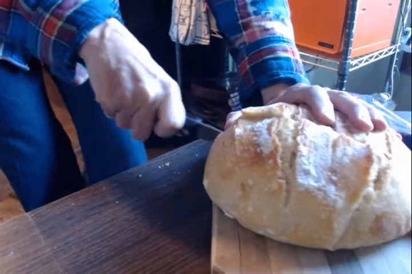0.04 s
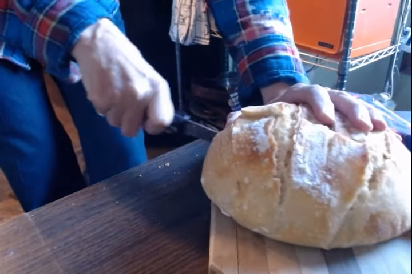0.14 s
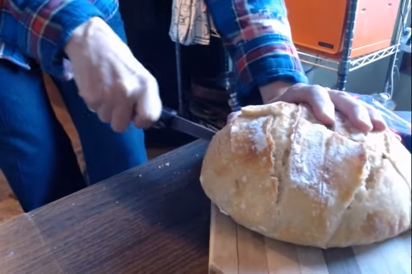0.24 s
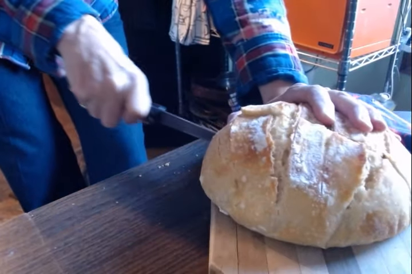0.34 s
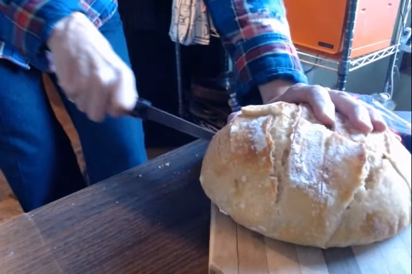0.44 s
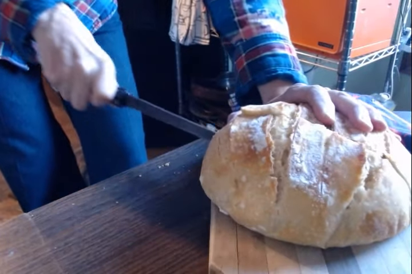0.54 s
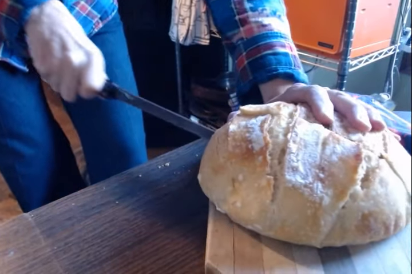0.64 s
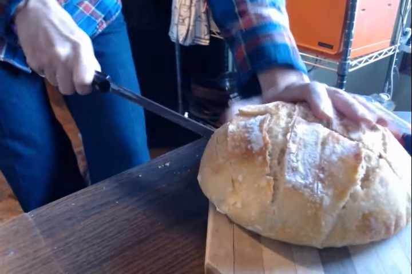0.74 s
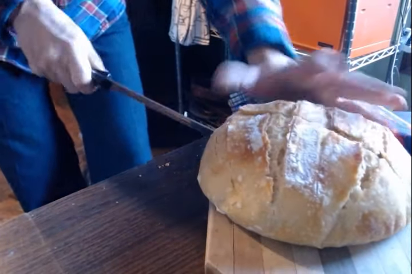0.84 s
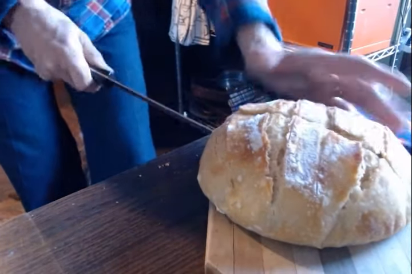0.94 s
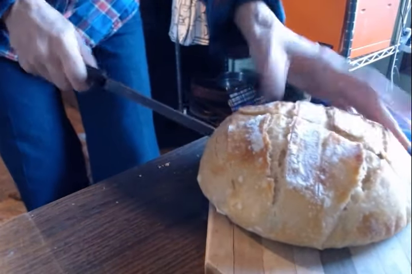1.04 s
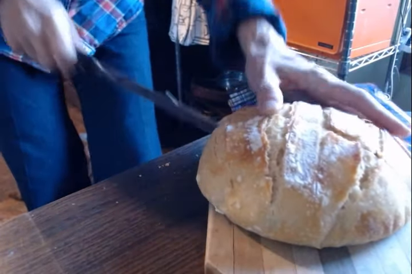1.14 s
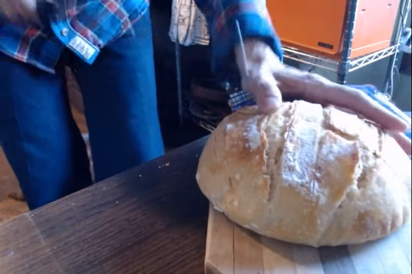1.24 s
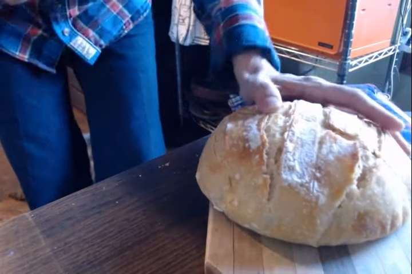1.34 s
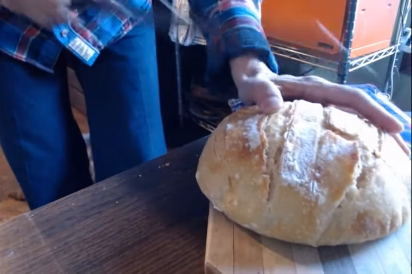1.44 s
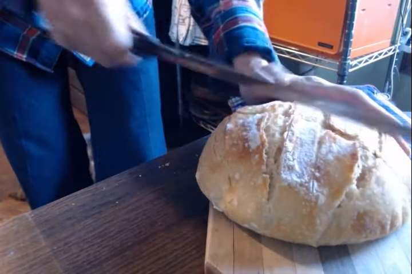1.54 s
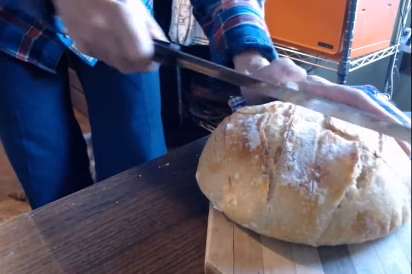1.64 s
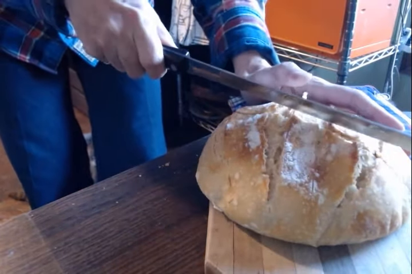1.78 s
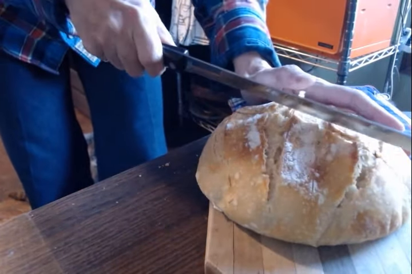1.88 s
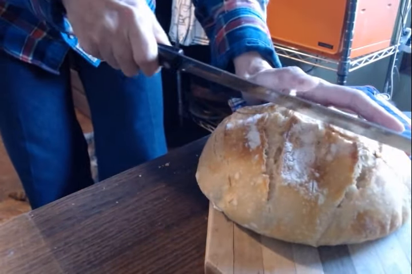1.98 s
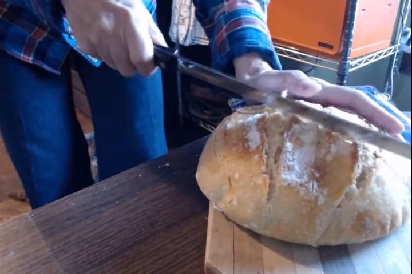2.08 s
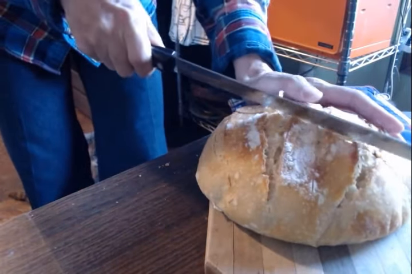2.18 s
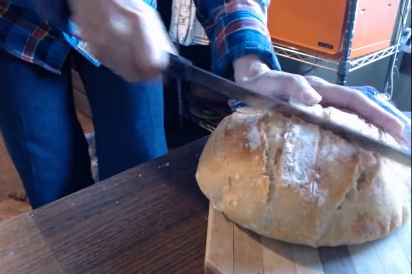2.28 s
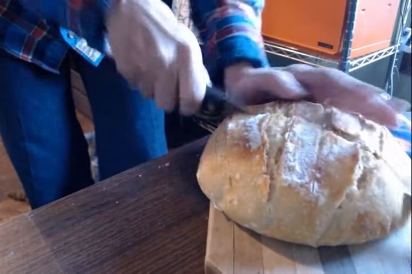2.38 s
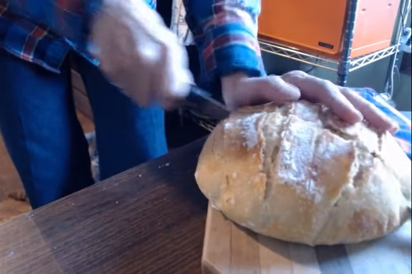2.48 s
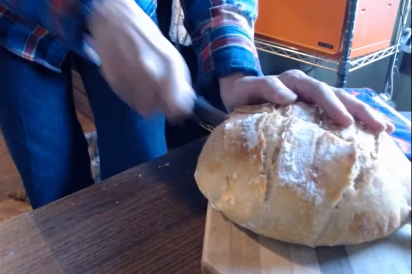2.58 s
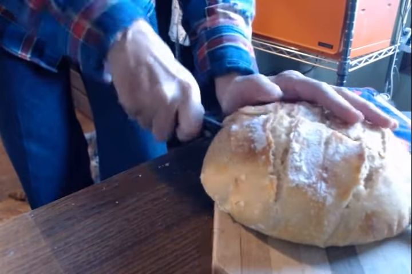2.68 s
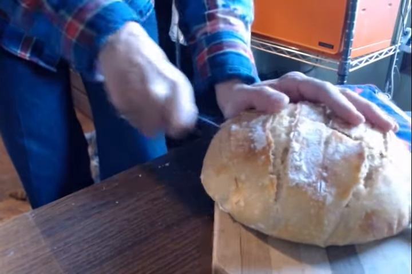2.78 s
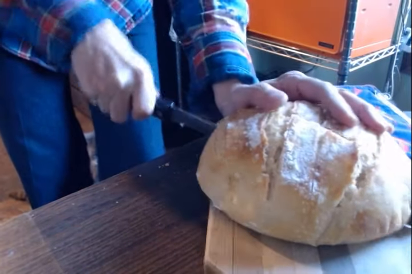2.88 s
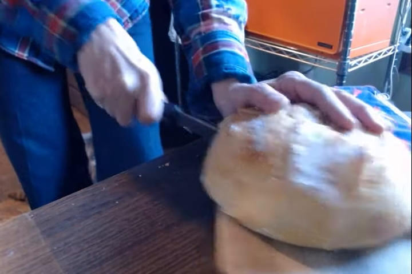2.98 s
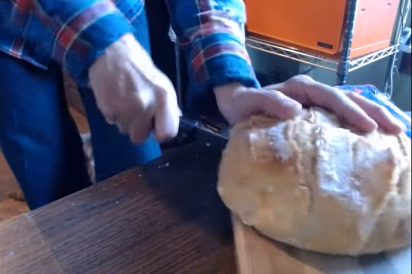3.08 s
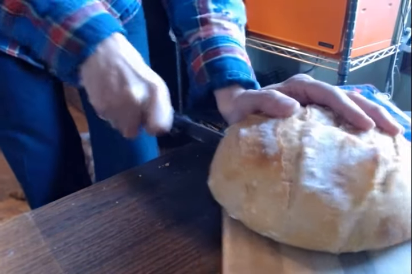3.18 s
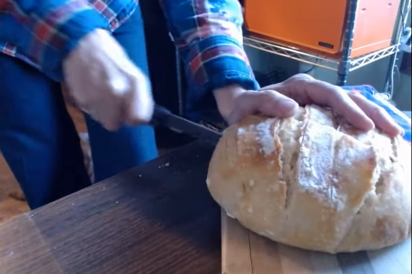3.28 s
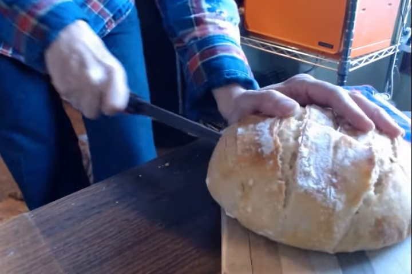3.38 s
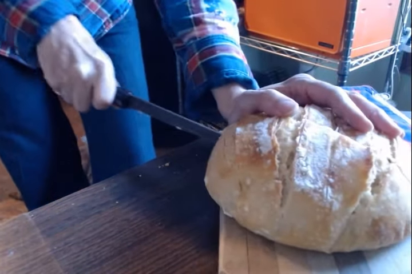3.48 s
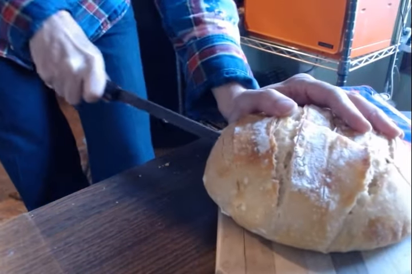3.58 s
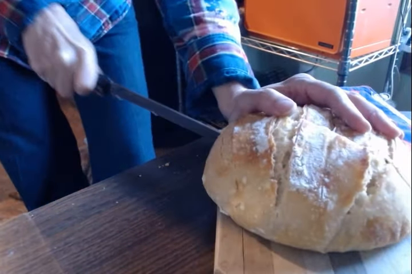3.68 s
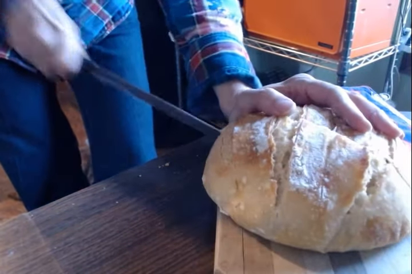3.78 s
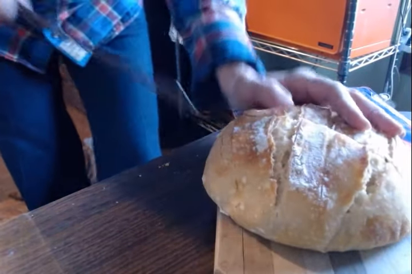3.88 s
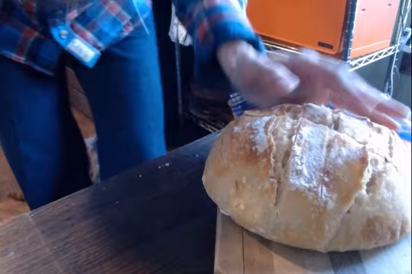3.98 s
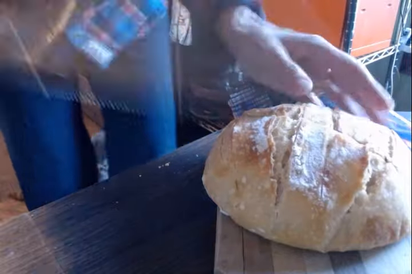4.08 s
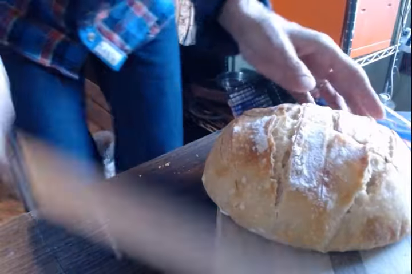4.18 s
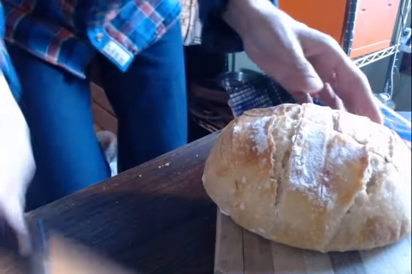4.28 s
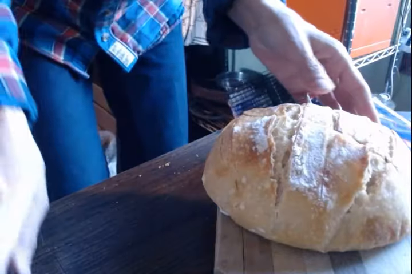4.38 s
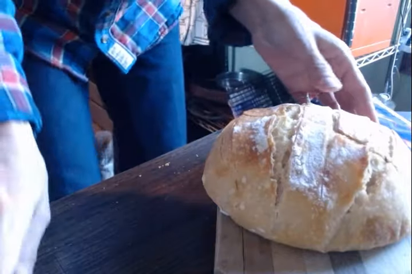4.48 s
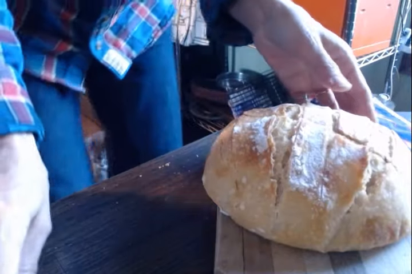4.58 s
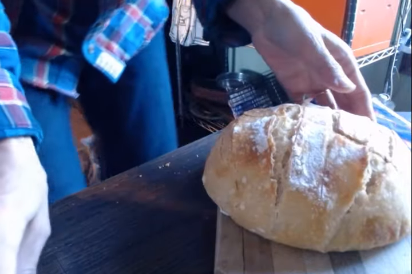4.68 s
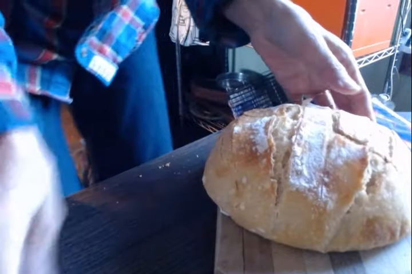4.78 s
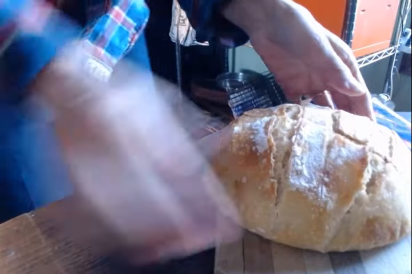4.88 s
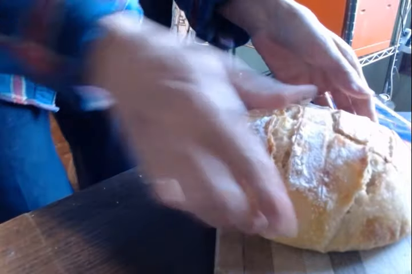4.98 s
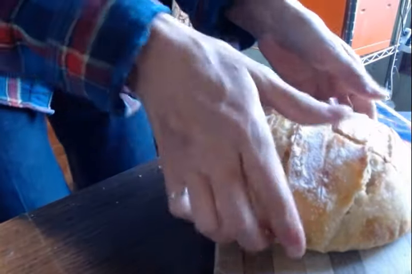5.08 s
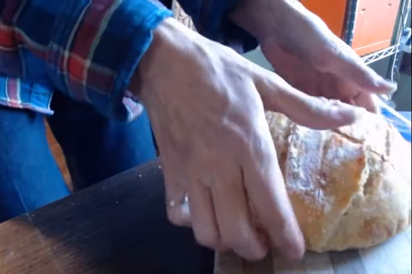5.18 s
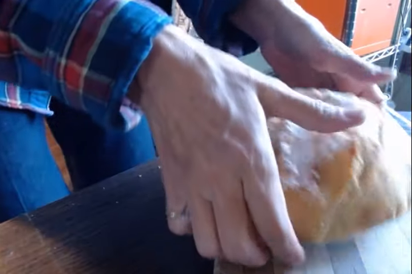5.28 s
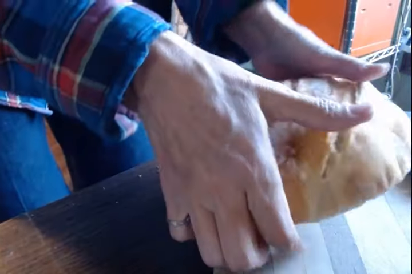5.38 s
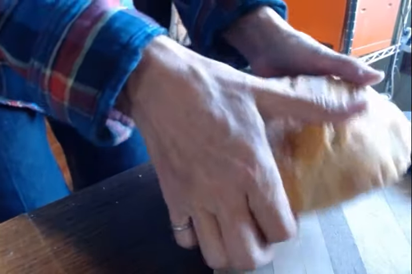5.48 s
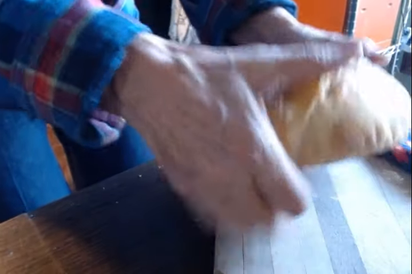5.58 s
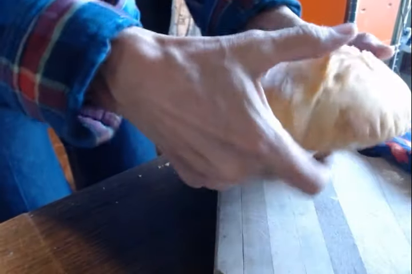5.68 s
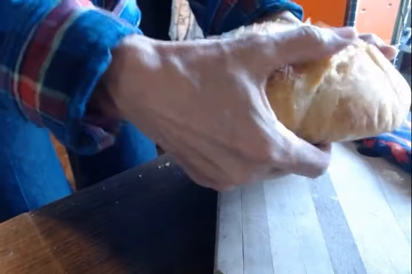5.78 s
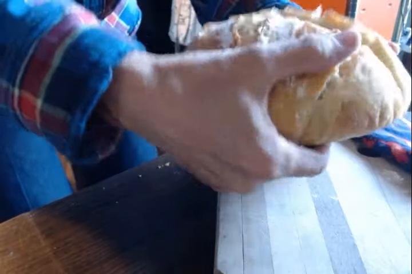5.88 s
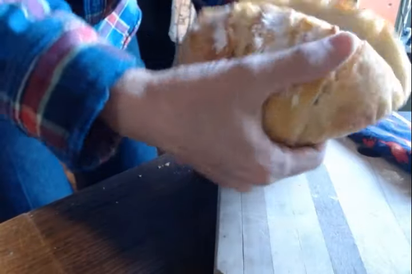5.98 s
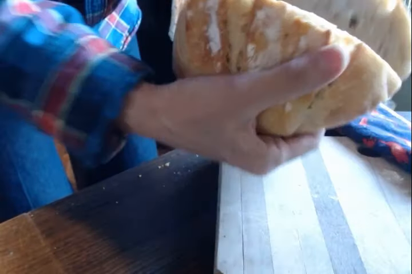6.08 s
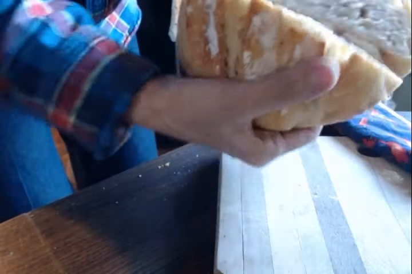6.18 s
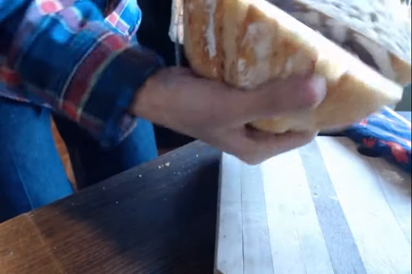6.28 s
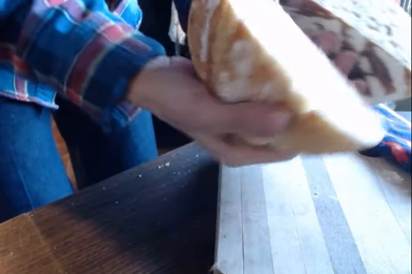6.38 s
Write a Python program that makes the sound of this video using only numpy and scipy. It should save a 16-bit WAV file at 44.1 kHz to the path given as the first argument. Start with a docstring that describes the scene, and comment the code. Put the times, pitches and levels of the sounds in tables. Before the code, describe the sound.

Close, uneven crunching comes from a knife cutting crusty bread, while the wooden board knocks lightly against the table. After a short pause the knife lands with a bright metallic rattle, the loudest sound, followed by a duller knock. Then the crust crackles and snaps as the loaf is pulled apart by hand. Soft sleeve rustle and a faint refrigerator hum fill the slightly reverberant kitchen.

```python
"""A bread knife saws through the bottom crust of a loaf on a wooden board and is laid on the table;
then two hands lift the loaf and break it open. The crust fails by brittle fracture: every contact is a
shower of tiny impulses that excites the damped modes of board, loaf and blade. Sleeves and palms
rustle by friction, and a refrigerator hums in the quiet, slightly reverberant kitchen."""
import sys
import numpy as np
from scipy import signal
from scipy.fft import rfft, irfft, next_fast_len
from scipy.io import wavfile

SR = 44100
rng = np.random.default_rng(int(sys.argv[2]) if len(sys.argv) > 2 else 0)


def master(y):
    """Save y as 16-bit WAV."""
    cut = np.clip(np.atleast_2d(y).T, -1, 1)
    pcm = np.round(cut * 32767)  # scale
    wavfile.write(sys.argv[1], SR, pcm.astype(np.int16))


N = 283733


def amp(db):
    """Amplitude ratio of a level in decibels."""
    return 10 ** (np.asarray(db) / 20)


def rms_one(x):
    """Normalisation to unit rms."""
    return x / np.sqrt(np.mean(np.abs(x) ** 2) + 1e-30)


def resonance(freqs, hz, width_hz):
    """Complex response of a damped oscillator, with unit gain at resonance."""
    loss = 1j * freqs * width_hz
    return loss / (hz ** 2 - freqs ** 2 + loss)


def body(freqs, modes, depth):
    """Modal superposition: resonances added to a flat response."""
    return 1 + depth * sum(amp(db) * resonance(freqs, hz, width) for hz, width, db in modes)


def shaped(x, response):
    """Linear filtering by a frequency response, scaled so that white noise keeps its rms."""
    size = next_fast_len(len(x))
    gain = rms_one(response(np.fft.rfftfreq(size, 1 / SR)))
    return irfft(rfft(x, size) * gain, size)[:len(x)]


def drift(rate_hz):
    """Slow random modulation: linear interpolation between standard normal values."""
    steps = rng.standard_normal(int(N / SR * rate_hz) + 2)
    return np.interp(np.arange(N) / SR * rate_hz, np.arange(len(steps)), steps)


def shot_noise(size, per_s, spread_db):
    """Shot noise of unit rms: independent impulses, a few much larger than the rest."""
    heights = amp(spread_db * np.minimum(rng.exponential(1, size), 4)) * rng.standard_normal(size)
    return rms_one(heights * (rng.random(size) < per_s / SR))


# Spectrum of the air noise: (frequency [Hz], relative spectral density [dB])
AIR_SPECTRUM = [(24, -32.5), (45, -27.5), (100, -9), (170, 5), (350, 3.5), (650, -20), (1080, -1),
                (1500, -4.5), (1900, -11.5), (3650, -18), (5440, -15.5), (9300, -22.5), (10300, -35),
                (15500, -42.5)]
# Resonances of the refrigerator casing: (frequency [Hz], bandwidth [Hz], gain [dB])
CASING_MODES = [(801, 10, 20), (969, 30, 7.5), (1127, 20, 3.5), (1630, 8.5, 11), (2740, 160, 10.5),
                (5380, 83, 5.5), (7900, 67, 4.5), (9450, 299, -1)]
# Tones of its motor: (frequency [Hz], rms level [dB])
MOTOR_TONES = [(120, -79.5), (1174, -85), (2197, -89)]


def room_tone(air_db=-70):
    """Forced vibration: a refrigerator's motor hums and its casing colours the steady air noise."""
    air_hz, density_db = np.transpose(AIR_SPECTRUM)
    air = lambda f: amp(np.interp(np.log(f + 1), np.log(air_hz), density_db))
    t = np.arange(N) / SR
    hum = sum(np.sqrt(2) * amp(db + 1.9 * drift(3)) * np.sin(2 * np.pi * hz * t)
              for hz, db in MOTOR_TONES)
    whir = shaped(rng.standard_normal(N), lambda f: air(f) * body(f, CASING_MODES, 1.0))
    return amp(air_db) * whir + hum


def reverberation(x, level_db=-24.5, t60_s=0.29, lowpass_hz=4000):
    """Diffuse field of the kitchen: dense reflections decay exponentially, duller than direct sound."""
    t = np.arange(SR // 2) / SR
    tail = rng.standard_normal(len(t)) * amp(-60 * t / t60_s) * (t > .006)
    tail = signal.lfilter(*signal.butter(1, lowpass_hz, fs=SR), tail)
    return amp(level_db) * signal.fftconvolve(x, tail / np.sqrt(np.sum(tail ** 2)))[:N]


# Movement of sleeves and palms: (time [s], low band level [dB], high band level [dB])
RUSTLE_LEVELS = [(0.0, -66.5, -71.5), (0.61, -68.5, -74), (0.95, -73.5, -80), (1.45, -76, -88),
                 (2.31, -77, -85), (2.47, -63.5, -71), (2.75, -64, -70.5), (3.1, -62.5, -66.5),
                 (3.36, -62, -66.5), (3.55, -65.5, -73), (3.8, -68, -75), (3.94, -77.5, -85.5),
                 (4.55, -75, -78), (4.9, -64.5, -66), (5.16, -70, -78), (5.8, -76.5, -88.5),
                 (6.1, -64, -70.5), (6.43, -68, -75.5)]


def rustle(low_hz=390, high_hz=3700):
    """Friction noise: cloth and skin rub in fine grains, in two broad bands of wavering level."""
    times, low_db, high_db = np.transpose(RUSTLE_LEVELS)
    out = 0
    for db, hz, width in ((low_db, low_hz, 4.0), (high_db, high_hz, 1.6)):
        level_db = np.interp(np.arange(N) / SR, times, db) + 2.07 * drift(25)
        grains = shot_noise(N, per_s=8000, spread_db=2.0)
        out = out + amp(level_db) * shaped(grains, lambda f: resonance(f, hz, width * hz) ** 3)
    return out


# Low modes of the board: (frequency [Hz], bandwidth [Hz], relative gain [dB])
BOARD_MODES = [(100, 40, -9), (270, 35, -2), (376, 40, 0), (510, 70, -6)]
# The board rocking on the table: (time [s], duration [s], greatest rms level [dB])
BOARD_PUSHES = [(.385, .075, -60), (2.495, .04, -60), (2.635, .06, -50), (2.812, .06, -52),
                (4.728, .06, -47), (2.32, .08, -64), (3.27, .1, -60), (3.78, .05, -66), (5.40, .04, -64)]


def rocking():
    """Random forcing: uneven pushes drive the hollow modes of a board that radiates no deep bass."""
    t = np.arange(N) / SR
    envelope = sum(amp(db) * np.sin(np.pi * np.clip((t - start) / duration, 0, 1))
                   for start, duration, db in BOARD_PUSHES)
    modes = lambda f: sum(amp(db) * resonance(f, hz, width) for hz, width, db in BOARD_MODES)
    radiation = lambda f: resonance(f, hz=313, width_hz=580) ** 2
    return shaped(envelope * rng.standard_normal(N), lambda f: radiation(f) * modes(f))


# Partials of blade and board that ring on: (frequency [Hz], relative level [dB], free T60 [s])
RINGING_PARTIALS = [(268.5, -2, 0.16), (370, 0.5, .14), (528, -3.5, .1), (730, -6, .1), (2724, -6, .15),
                    (991, -3.5, .2), (1044, 0.5, 0.16), (1252, -1.5, .12), (1603, 0, 0.23),
                    (1690, -4, 0.151), (2205, -2, 0.19), (2467, -6, 0.22), (3150, -2.5, .25),
                    (3560, -6, .25), (3864, -8.5, .15), (4420, -7.5, 0.22), (4920, -5, .25),
                    (5297, -3.5, .2), (7230, -8, .2), (7564, -9, .2), (9520, -7, .2), (10020, -6.5, .25),
                    (10720, -9, .2), (11980, -9.5, .2), (13140, -12, .2), (2620, -8, 0.18), (3005, -2, .26),
                    (3446, -6, .16), (4116, -2, .05), (5570, -0.5, .11), (6120, -9, 0.23),
                    (6700, -0.5, 0.18), (7000, -9, .1), (7900, -1, .16)]
# Hard contacts, with the damping of hand and loaf as a factor on T60:
# (time [s], level [dB], centre frequency [Hz], reach to -6 dB [octaves], T60 factor [1])
HARD_STRIKES = [(0.382, -55, 2740, .03, 0.69), (0.403, -52.5, 270, .1, 1.3), (0.425, -55, 317, .3, 1.0),
                (0.552, -52, 1750, 0.089, .4), (0.554, -54, 4260, .12, 0.62),
                (0.632, -51, 4140, 0.093, 0.74), (1.847, -55.5, 2740, 0.034, 1.2),
                (2.097, -63, 6150, .03, .6), (2.098, -65, 7825, .02, 0.63), (2.284, -50, 6150, .04, 1.3),
                (2.534, -54, 1040, .05, .8), (2.618, -42.5, 1120, .14, 1.3), (2.619, -48, 3440, 0.057, 1.2),
                (2.638, -38, 1656, .06, 0.59), (2.639, -33, 1110, 0.13, 0.65), (2.652, -42.5, 372, .1, 1.4),
                (2.812, -42, 1036, 0.07, 0.69), (2.826, -48, 385, .12, 1.2), (2.845, -50, 1120, .2, .6),
                (2.977, -43, 3430, .08, 0.75), (3.01, -45, 7100, .05, .9), (3.09, -47, 3420, 0.045, .9),
                (3.168, -37, 1610, .1, 0.93), (3.168, -37, 2440, 0.16, 0.72),
                (3.172, -39.5, 1245, .05, 0.85), (3.184, -39, 3080, 0.11, 0.76),
                (3.183, -38, 2000, 0.38, .4), (4.144, -53, 7000, .03, 0.73), (4.479, -19, 2610, 0.035, .7),
                (4.487, -26.5, 6440, 0.55, 0.72), (4.526, -34, 5500, .9, 0.45),
                (4.545, -34, 7500, 0.53, 0.65), (4.558, -38, 5000, .9, 0.42), (4.75, -46.5, 7640, .08, 0.7),
                (4.752, -42, 6200, .05, .9), (4.748, -47, 9500, 0.043, .9), (4.726, -27.5, 1250, .08, 0.74),
                (4.726, -29, 1690, .03, .5), (4.729, -31, 420, .4, 1.5), (4.73, -28, 980, .04, 0.7)]


def pings(swell_cycles=3.5):
    """Free vibration: a strike excites the partials near its centre frequency, which waver and decay."""
    t = np.arange(SR // 4) / SR
    out = np.zeros((len(RINGING_PARTIALS), N + len(t)))
    hz, partial_db, t60 = np.transpose(RINGING_PARTIALS)[:, :, None]
    tones = np.minimum(t * hz / swell_cycles, 1) * np.sin(2 * np.pi * hz * t)
    for start, db, centre_hz, reach, t60_factor in HARD_STRIKES:
        at = round(start * SR)
        coupling_db = -6 * (np.log2(hz / centre_hz) / reach) ** 2
        excited = coupling_db[:, 0] > -45
        level_db = (db + coupling_db + partial_db)[excited] - 60 * t / (t60[excited] * t60_factor)
        out[excited, at:at + len(t)] += amp(level_db) * tones[excited]
    return sum(partial[:N] * amp(3 * drift(80)) for partial in out)


# Single breaks of the crust and the knife's sharpest ticks:
# (time [s], level [dB], frequency [Hz], decay to 1/e [cycles])
SHARP_SNAPS = [(2.2555, -54, 3040, 4.5), (2.2557, -55, 9800, 6.0), (2.289, -46.5, 8000, 3.0),
               (2.2925, -42, 6500, 2.5), (2.3305, -43, 3000, 3.0), (2.361, -38, 6200, 2.7),
               (2.366, -40, 6500, 2.5), (2.372, -46, 9550, 8.0), (2.976, -41.5, 1710, 10),
               (2.9765, -40.5, 3500, 14), (4.1434, -45, 5600, 4.0), (2.993, -39, 12500, 2.5),
               (2.9932, -38, 5000, 1.5), (3.041, -46, 3300, 5.0), (3.0555, -43, 3300, 5.0),
               (4.862, -43, 5900, 12.0), (4.8665, -49, 4860, 12.0), (4.868, -49, 5900, 10.0),
               (3.0096, -32, 6960, 3.4), (3.1875, -30.5, 1640, 4), (3.1885, -25.5, 3030, 7),
               (3.2344, -34, 6000, 3), (3.273, -30.5, 3250, 3.9), (3.449, -52, 6100, 1.2),
               (4.4793, -15, 5000, 1.5), (4.4902, -13, 4500, 0.9), (4.4965, -17, 6500, 3.0),
               (5.3842, -37, 3100, 3.5), (5.3844, -43, 7200, 8.0), (5.389, -45, 3200, 8.0),
               (5.39, -50, 10400, 12.0), (5.3955, -44, 6700, 25.0), (5.851, -39, 9400, 1.1),
               (5.9176, -36.5, 3100, 4.5), (6.0394, -18, 3600, 1.1), (6.0457, -16, 2500, 1.1),
               (6.048, -26, 3010, 0.64), (6.0585, -25, 2280, 1.4), (6.0975, -26.5, 2300, 1.3),
               (6.102, -31, 4460, 1.2), (6.129, -41.5, 6000, 1.2), (6.147, -40, 6960, 1.3)]


def snaps(size=400, highpass_hz=1000):
    """Impulse response of a small source: a damped sinusoid from a break too small to radiate bass."""
    out, t = np.zeros(N + size), np.arange(size) / SR
    for start, db, hz, cycles in SHARP_SNAPS:
        at = round(start * SR)
        envelope = np.minimum(2 * t * hz, 1) * np.exp(-t * hz / cycles)
        out[at:at + size] += amp(db) * envelope * np.sin(2 * np.pi * hz * t)
    return signal.sosfilt(signal.butter(3, highpass_hz, "high", fs=SR, output="sos"), out[:N])


# Coupled modes of knife and board: (frequency [Hz], bandwidth [Hz], relative gain [dB])
KNIFE_MODES = [(335, 27, 7.5), (833, 14, 7), (1068, 60, 9), (1223, 58, 13), (1595, 190, 10.5),
               (1750, 50, 12), (2257, 28, 6.5), (2425, 88, 5.5), (2717, 87, 5), (3026, 99, 7),
               (3260, 80, 7), (3550, 88, 4), (3960, 70, 5), (4077, 110, 4), (4460, 70, 9), (4940, 110, 5),
               (5606, 130, 6.5), (6160, 90, 8), (6620, 120, 2.5), (7870, 90, 8), (7640, 47, 2),
               (8850, 43, 0.5), (9530, 120, 7), (9990, 100, 4), (12900, 160, 6)]


def contacts(rows, knife_depth, flake_depth, per_s, spread_db, thud_width, crunch_width,
             widen_oct_per_db, crackle_t60_factor, sizzle_db, size=12000):
    """Source and filter: three impulse showers (thud, crunch, crackle) excite knife and loose flakes.
    Widths are fractions of the centre frequency."""
    out = np.zeros(N + size)
    t, freqs = np.arange(size) / SR, np.fft.rfftfreq(size, 1 / SR)
    for start, hold, t60, thud_db, crunch_db, crackle_db, crackle_hz, crackle_width in rows:
        at = round(start * SR)
        rise = .0011 + .17 * hold  # a longer contact swells more slowly
        attack = np.clip(t / rise, 0, 1) ** 2
        decay_time = np.clip(t - rise - hold, 0, None)
        # each contact grips the blade elsewhere, so its modes get new strengths
        modes = np.array(KNIFE_MODES) + [0, 0, 2] * rng.standard_normal((len(KNIFE_MODES), 1))
        knife = body(freqs, modes, knife_depth)
        flakes = body(freqs, [(hz, 0.021 * hz, 0) for hz in rng.uniform(4800, 15500, 12)], flake_depth)
        # a harder thud is higher; the crunch rises where crackle outweighs thud and widens when loud
        thud_hz = np.clip(747 * 2 ** (0.1 * (thud_db + 55.5)), 590, 960)
        crunch_hz = 2650 * 2 ** (.012 * np.clip(crackle_db - thud_db, -40, 15))
        widening = 2 ** (widen_oct_per_db * (crunch_db + 50))
        showers = ((thud_db, thud_hz, thud_width, t60),
                   (crunch_db, crunch_hz, crunch_width * widening, t60),
                   (crackle_db, crackle_hz, crackle_width, t60 * crackle_t60_factor))
        for db, hz, width, shower_t60 in showers:
            force = attack * amp(-60 * decay_time / shower_t60) * shot_noise(size, per_s, spread_db)
            band = resonance(freqs, hz, width * hz) ** 4  # four in cascade for steep skirts
            sizzle = amp(sizzle_db) * resonance(freqs, 2 * hz, hz) ** 4  # the finest crumbs
            colour = rms_one(knife * flakes * (band + sizzle))
            out[at:at + size] += amp(db) * irfft(rfft(force) * colour, size)
    return out[:N]


# The knife meeting the table: (time [s], hold [s], T60 [s], thud level [dB], crunch level [dB],
# crackle level [dB], crackle frequency [Hz], crackle fractional width [1])
KNIFE_IMPACTS = [(4.4785, 0.0032, 0.13, -36, -27, -26.5, 6450, 1.4),
                 (4.486, 0.0087, 0.3, -44, -52, -25, 7360, 2.2),
                 (4.525, 0.022, 0.26, -48, -35, -32.5, 7160, 1.8),
                 (4.555, 0.011, 0.34, -54, -51, -36.5, 7000, 1.3),
                 (4.725, 0.012, 0.2, -31.5, -35, -55.5, 5640, 0.26),
                 (4.745, 0.011, 0.29, -36, -49, -52, 7400, 0.94),
                 (4.859, 0.008, 0.089, -69, -71, -57, 6040, 1.6)]


def knife_laid_down():
    """Impact and rebound: the knife lands and rattles in dense, broadband bursts."""
    return contacts(KNIFE_IMPACTS, knife_depth=0.7, flake_depth=.6, per_s=13000, spread_db=2.5,
                    thud_width=2.34, crunch_width=1.62, widen_oct_per_db=0.0092,
                    crackle_t60_factor=0.55, sizzle_db=-17.5)


# Hands gripping and breaking the loaf: columns as in KNIFE_IMPACTS
LOAF_BREAKS = [(5.386, 0.012, 0.1, -68, -58, -55, 7000, .4),
               (5.476, 0.01, .1, -75.5, -68.5, -73, 6070, 1.1),
               (5.851, 0.0047, 0.059, -83.5, -83, -68, 8520, 1.2),
               (5.9, 0.01, 0.085, -79, -67, -74, 6500, 1.2),
               (5.917, 0.0027, 0.16, -69, -58.5, -56.5, 6410, 0.54),
               (5.955, 0.038, 0.24, -67.5, -63.5, -64.5, 6530, 0.73),
               (6.017, 0.0066, .1, -80, -64, -56, 7400, .94),
               (6.025, 0.012, 0.095, -76, -50, -48.5, 6500, 1.4),
               (6.0395, 0.0047, 0.17, -74, -39.5, -42.5, 6560, 1.03),
               (6.0455, 0.0056, .16, -68, -38.5, -50, 6470, 2.6),
               (6.097, 0.0057, 0.22, -76, -48, -49, 4830, 0.66),
               (6.128, 0.013, 0.08, -77, -58, -58.5, 6380, .6),
               (6.375, 0.017, .15, -73, -82.5, -67, 7500, 1.6)]


def tearing():
    """Brittle fracture by hand: the crust cracks open with little modal ringing."""
    return contacts(LOAF_BREAKS, knife_depth=0.18, flake_depth=0.93, per_s=6800, spread_db=3.0,
                    thud_width=1.4, crunch_width=1.3, widen_oct_per_db=0.072,
                    crackle_t60_factor=0.74, sizzle_db=-19.5)


# Blade and palm against the loaf: columns as in KNIFE_IMPACTS
SAW_CONTACTS = [(0.31, 0.022, 0.3, -87, -75, -72, 6050, 1.5),
                (0.551, 0.0053, 0.45, -71, -66, -66.5, 5110, 0.43),
                (0.632, 0.0045, 0.32, -65.5, -70, -81, 5030, .7),
                (0.784, 0.0071, 0.092, -76, -78, -73, 8900, 0.92),
                (0.884, 0.01, 0.11, -82, -76, -80, 11000, 2.3),
                (2.1, 0.0086, 0.087, -73, -78, -75, 7500, 0.47),
                (2.252, 0.03, 0.2, -75, -68, -64, 8100, .6),
                (2.282, 0.044, 0.2, -68, -61.5, -53, 7500, 1.5),
                (2.322, 0.03, 0.15, -60.5, -55.5, -52, 8500, 1.9),
                (2.357, 0.021, 0.17, -56.5, -59, -52.5, 7040, 1.3),
                (2.49, 0.026, 0.1, -63, -63, -68.5, 5100, 0.51),
                (2.61, 0.037, 0.23, -46.5, -58, -82, 5890, .75),
                (2.638, 0.0096, 0.16, -50, -51.5, -89, 6040, .75),
                (2.792, 0.049, 0.21, -52, -54, -70.5, 6800, 2.3),
                (2.92, 0.025, 0.22, -88, -72, -67, 10600, 1.2),
                (2.975, 0.007, 0.14, -60, -47, -58.5, 6500, 1.8),
                (2.99, 0.025, 0.3, -85.5, -84, -61, 12000, 1.8),
                (3.008, 0.033, 0.22, -65, -52, -58.5, 6860, 0.8),
                (3.09, 0.018, 0.14, -71, -61, -61.5, 8000, 0.93),
                (3.165, 0.033, 0.14, -57.5, -45, -58.5, 6000, .42),
                (3.234, 0.005, 0.38, -63, -52, -52.5, 6200, .93),
                (3.273, 0.013, 0.37, -58.5, -53, -59, 7150, 2.3),
                (3.365, 0.0089, 0.13, -78, -65, -64, 10000, 3),
                (3.448, 0.022, 0.27, -68, -67, -66.5, 5600, 1.3),
                (4.105, 0.053, 0.27, -82, -84, -72, 5240, 0.54),
                (4.143, 0.015, 0.25, -82, -81, -66, 5260, .7)]


def sawing():
    """Brittle fracture under a blade: the crumbling crust sets knife, board and flakes ringing."""
    return contacts(SAW_CONTACTS, knife_depth=1.6, flake_depth=2.2, per_s=4600, spread_db=2.5,
                    thud_width=1.47, crunch_width=1.39, widen_oct_per_db=0.0034,
                    crackle_t60_factor=0.57, sizzle_db=-17.5)


def scene():
    """Superposition of the direct sound at the board, its reverberation and the background."""
    direct = sawing() + knife_laid_down() + tearing() + snaps() + pings() + rocking()
    return (direct + reverberation(direct) + rustle() + room_tone())[None]


def record(dry):
    """Band limiting: a steep low-pass filter removes the treble above 16.5 kHz."""
    return signal.sosfilt(signal.cheby2(24, 70, 16500, fs=SR, output="sos"), dry)


dry = scene()
out = record(dry)
master(out)
```